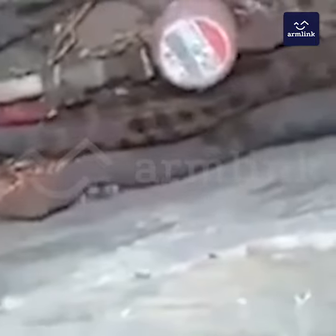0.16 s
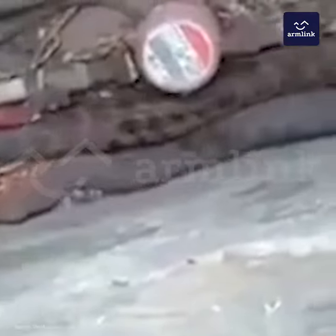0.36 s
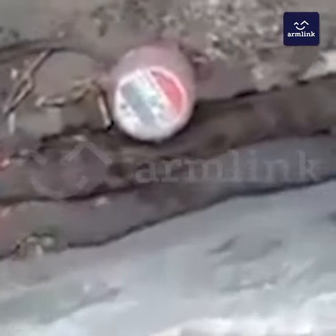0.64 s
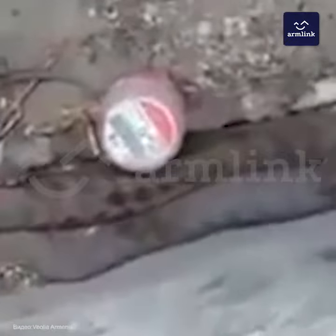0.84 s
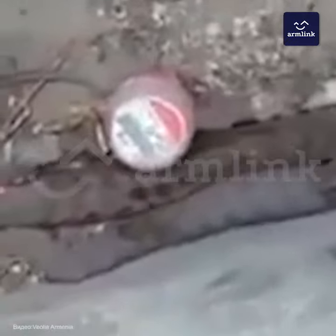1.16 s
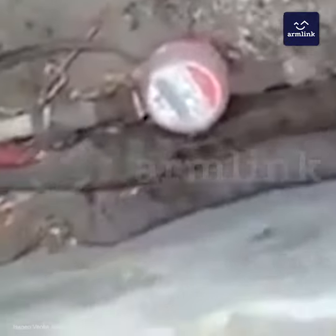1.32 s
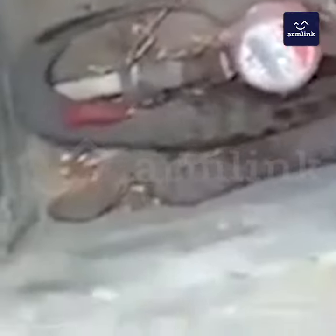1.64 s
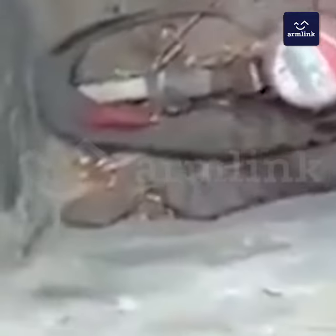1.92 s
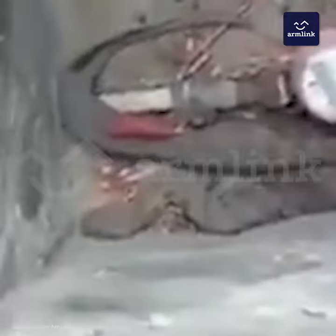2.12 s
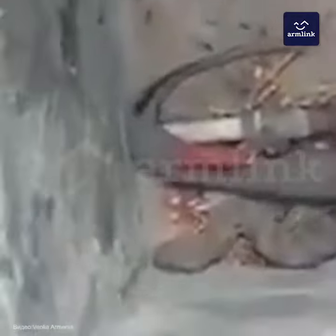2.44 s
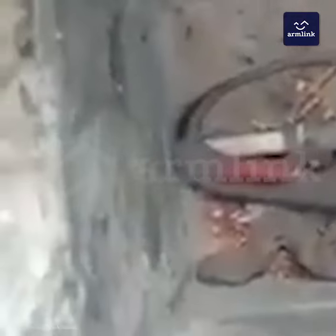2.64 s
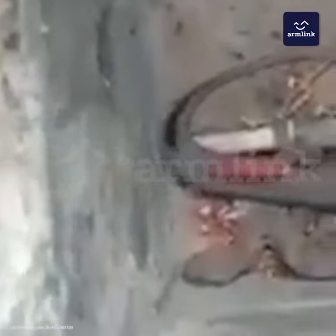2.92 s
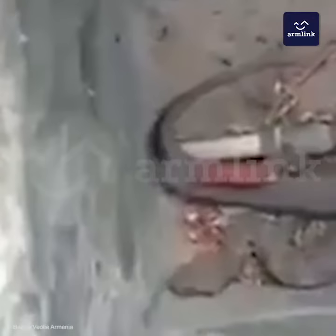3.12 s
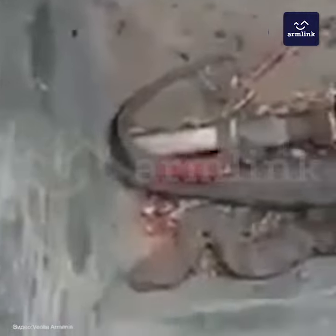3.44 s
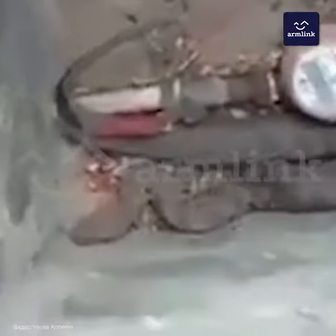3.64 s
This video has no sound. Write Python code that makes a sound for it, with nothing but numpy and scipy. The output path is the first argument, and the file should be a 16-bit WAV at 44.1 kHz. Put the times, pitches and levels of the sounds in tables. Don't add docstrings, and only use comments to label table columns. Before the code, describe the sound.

Continuous bright snake hiss close to a phone microphone, fading and turning throaty, over a soft draughty hum; a hollow knock early, a dull handling thump around one second, light taps later, watery close echoes off concrete.

```python
import sys
import numpy as np
from scipy import signal
from scipy.io import wavfile
from scipy.ndimage import uniform_filter1d

SR = 44100
rng = np.random.default_rng(int(sys.argv[2]) if len(sys.argv) > 2 else 0)


def file_out(sig):
    cols = np.atleast_2d(sig).T
    lim = np.clip(cols, -1, 1)
    pcm = np.round(lim * 32767).astype(np.int16)
    wavfile.write(sys.argv[1], SR, pcm)


def undo_db(level):
    steps = np.asarray(level, float) / 20
    return 10 ** steps


N = 166257
HOP, SIZE = 128, 1024
T = np.arange(N // HOP + 12) * HOP / SR
HZ = np.fft.rfftfreq(SIZE, 1 / SR)[:, None]
FULL_ABOVE_HZ = 1000


def curves(table):
    s, *cols = np.transpose(table)
    return [np.interp(T, s, c) for c in cols]


def evened(x, axis=None):
    return x / np.sqrt(np.mean(abs(x) ** 2, axis, keepdims=True) + 1e-20)


def colour(points):
    f, db = np.transpose(points)
    return undo_db(np.interp(np.log(HZ + 1), np.log(f + 1), db, right=-90))


def peak(hz, width):
    return 1 / (1 + (2 * (HZ - hz) / width) ** 2)


def low_cut(hz):
    return 1 / (1 + (hz / (HZ + 1)) ** 6)


def drift(rows, frames, bins=1):
    field = rng.standard_normal((len(T), rows)).T
    for _ in range(3):
        field = uniform_filter1d(field, frames, 1)
    return evened(uniform_filter1d(field, bins, 0))


def noise(gain):
    white = np.pad(rng.standard_normal(N), (0, 8 * HOP))
    z = signal.stft(white, nperseg=SIZE, noverlap=SIZE - HOP)[2]
    return signal.istft(z * gain[:, :z.shape[1]], nperseg=SIZE, noverlap=SIZE - HOP)[1][:N]


def add(mix, s, sound):
    part = mix[round(s * SR):][:len(sound)]
    part += sound[:len(part)]


def snake():
    # t/s, effort/dB, mouth resonance f/Hz, gape as upper resonance level/dB, rasp level/dB
    breath = [(.08, -42.5, 6180, -3, -11.5), (.8, -45.5, 5990, -2.5, -6), (.88, -41.5, 6180, -7.5, -5.5),
              (1.13, -42.5, 5770, -6, -7), (1.19, -48.5, 6040, -15, -4.5), (1.4, -59.5, 5850, -5.5, 5),
              (1.55, -50.5, 6410, -12.5, -4), (1.9, -51.5, 6530, -16.5, -4), (2.05, -57.5, 5870, -4.5, 7),
              (2.11, -53, 6360, -11.5, -7.5), (2.33, -54, 6540, -8, -1.5), (2.43, -61.5, 6250, 0.5, -1.5),
              (2.64, -59.5, 6000, -1.5, 1.5), (2.76, -55.5, 5580, -4.5, -1.5), (3.02, -58, 5860, -2.5, 2),
              (3.15, -54, 5800, -8, -3), (3.24, -58.5, 5900, -4, 1), (3.77, -59, 6380, -4.5, -3.5)]
    # f/Hz, level/dB
    rasp_spectrum = [(1500, -68), (2120, -3.5), (2400, -0.5), (3300, -1.5), (4200, -1), (5000, -4),
                     (6500, -48), (9000, -17.5)]
    effort_db, mouth_hz, gape_db, rasp_db = curves(breath)
    skirt = undo_db(-9) * peak(mouth_hz, width=3500)
    mouth = evened(peak(mouth_hz, width=900) + skirt, 0)
    upper = undo_db(gape_db) * evened(peak(8250, width=3630) ** 2)
    rasp = undo_db(rasp_db) * evened(colour(rasp_spectrum))
    flutter_db = 0.5 * drift(1, frames=9)
    return undo_db(effort_db + flutter_db) * np.sqrt(mouth ** 2 + upper ** 2 + rasp ** 2)


def echo_comb():
    echo_db, last_s, sway_m, sway_per_s = -3, .014, .004, 1.2
    delay = rng.uniform(.03, 1, (16, 1)) ** 1.5 * last_s
    phase = 2 * np.pi * rng.random((16, 6, 1))
    rate = sway_per_s * np.geomspace(.2, 2, 6)[:, None]
    sway = np.sin(2 * np.pi * rate * T[::4] + phase).sum(1)
    delay = delay + sway_m / 343 * sway
    echoes = sum(np.exp(-2j * np.pi * HZ * d) for d in delay) / 4
    gain = abs(1 + undo_db(echo_db) * echoes).repeat(4, 1)
    gain = uniform_filter1d(gain, 4, 1)[:, :len(T)]
    return gain / np.sqrt(uniform_filter1d(gain ** 2, 15, 0))


def walls():
    # start t/s, length t/s, from f/Hz, to f/Hz, width f/Hz
    broad_nulls = [(-.01, 0.14, 3680, 3620, 320), (0.0, 0.42, 5170, 5100, 110),
                   (0.07, 0.27, 1950, 2040, 170), (.28, .29, 1900, 1960, 120),
                   (0.13, 0.19, 3300, 3360, 110), (0.33, 0.27, 3420, 3400, 210),
                   (0.4, 0.23, 5000, 5000, 110), (.75, .06, 3500, 3530, 150), (0.85, 0.29, 3850, 3810, 75),
                   (1.13, 0.17, 3010, 2970, 150), (1.16, 0.14, 8970, 8970, 120),
                   (1.17, 0.21, 1950, 2100, 70), (1.23, 0.17, 1060, 1030, 85), (1.45, .16, 1090, 1230, 190),
                   (1.28, 0.17, 4520, 4490, 210), (1.85, 0.6, 3880, 3690, 140),
                   (1.92, 0.31, 4460, 4390, 110), (2.04, 0.27, 5010, 4990, 140),
                   (2.24, 0.25, 1750, 1740, 100), (2.28, 0.12, 4360, 4320, 200),
                   (2.25, 0.3, 4790, 4790, 100), (2.36, .09, 2980, 2970, 140),
                   (2.65, 0.27, 6700, 6390, 140), (2.89, 0.22, 4540, 4400, 130),
                   (3.13, .16, 4450, 4500, 190), (3.31, .15, 4510, 4470, 240),
                   (2.98, 0.35, 4020, 4020, 110), (3.29, 0.42, 6350, 6480, 90),
                   (3.42, 0.1, 3330, 3350, 200), (3.46, 0.15, 1070, 1060, 100)]
    # start t/s, length t/s, from f/Hz, to f/Hz
    thin_nulls = [(.1, .1, 3620, 3580), (.18, .17, 3930, 3880), (.18, .42, 4660, 4630),
                  (.55, .12, 1160, 1160), (.65, .15, 5060, 5130), (.62, .36, 2900, 3000),
                  (.96, .09, 6150, 6170), (1.03, .2, 4490, 4460), (1.05, .06, 1850, 1850),
                  (1.4, .15, 3150, 3120), (1.5, .27, 3440, 3380), (1.52, .19, 4500, 4600),
                  (1.64, .2, 4330, 4300), (1.72, .17, 1030, 1060), (1.99, .15, 1730, 1850),
                  (2, .1, 7720, 7820), (2.5, .33, 4110, 4060), (2.54, .12, 3620, 3450),
                  (2.7, .09, 3420, 3410), (2.95, .3, 2760, 2750), (3, .09, 1090, 1090),
                  (3.19, .1, 5580, 5530), (3.28, .16, 1150, 1150), (3.3, .45, 1010, 1010),
                  (3.4, .2, 4030, 4000), (3.5, .1, 3520, 3560), (3.68, .09, 2950, 3030),
                  (1.3, .3, 7200, 7250)]
    gain = echo_comb()
    nulls_db = np.zeros(gain.shape)
    for start, length, from_hz, to_hz, width_hz in [*broad_nulls, *[(*row, 65) for row in thin_nulls]]:
        along = (T - start) / length
        wander_hz = 12 * drift(1, frames=20)
        centre_hz = from_hz + (to_hz - from_hz) * along + wander_hz
        depth_db = -24 * (width_hz / 110) ** .4 + 5 * drift(1, frames=9)
        inside = np.clip(1 - (2 * along - 1) ** 6 * .5, 0, 1)
        now = inside > 0
        notch = np.exp(-(1.4 * (HZ - centre_hz[:, now]) / max(width_hz, 85)) ** 2)
        nulls_db[:, now] = np.minimum(nulls_db[:, now], (depth_db * inside)[:, now] * notch)
    patchy_db = 0.54 * drift(len(HZ), frames=24, bins=12)
    return gain * undo_db(nulls_db + patchy_db)


def streaks():
    field = drift(len(HZ), frames=30, bins=2)
    gaps = np.clip(-field - 1.3, 0, 1) / (1 + (HZ / 6000) ** 4)
    gaps = gaps * np.where(HZ > FULL_ABOVE_HZ, 1, .6)
    return evened(undo_db(1.9 * field - 26 * gaps))


def thumping():
    # t/s, peak level/dB, f/Hz
    thumps = [(0.05, -77, 88.5), (0.535, -73, 88), (0.633, -64, 81.5), (0.882, -75, 98),
              (1.128, -53.5, 96.6), (1.247, -64, 95), (1.636, -76, 93.5), (1.992, -71, 87),
              (2.426, -75, 99), (2.598, -71.5, 108), (2.668, -68, 92), (3.225, -64, 102)]
    rise_s, t60_s, gain_db = 0.0285, 0.15, 8
    out, t = np.zeros(N), np.arange(SR // 4) / SR
    rise = np.sin(np.pi / 2 * np.minimum(t / rise_s, 1)) ** 2
    for s, db, hz in thumps:
        fall = undo_db(db + gain_db - 60 * t / t60_s)
        add(out, max(s - rise_s / 2, 0), rise * fall * np.sin(2 * np.pi * hz * t))
    return out


def knocking():
    # t/s, peak level/dB
    knocks = [
        (0.378, -48),
        (0.736, -66),
        (0.876, -70),
        (0.969, -70),
        (2.014, -63),
        (3.248, -66),
    ]
    # f/Hz, level/dB, decay t60/s
    knock_modes = [(102, -10, 0.14), (341, 0, 0.049), (660, 5.5, 0.025), (917, -6, 0.025)]
    rise_s, gain_db = 0.0016, 5.5
    out, t = np.zeros(N), np.arange(SR // 4) / SR
    ring = sum(undo_db(db - 60 * t / t60) * np.sin(2 * np.pi * hz * t) for hz, db, t60 in knock_modes)
    for s, db in knocks:
        add(out, s - rise_s, undo_db(db + gain_db) * np.minimum(t / rise_s, 1) * ring)
    return out


def pit():
    # t/s, hum level/dB, rustle level/dB, lower pipes level/dB
    draught = [(0, -54.5, -0.5, 1.5), (.1, -54, -2, -13), (.6, -58, 0.5, -17), (.74, -62.5, 0.5, -13),
               (.9, -54.5, -3.5, -2), (1.12, -54.5, -5, -1), (1.16, -67, -6, 6.5), (1.3, -68, -6.5, 2.5),
               (1.6, -63.5, -6, 1.5), (1.72, -61, 0, 1), (1.9, -60, 0, 3), (2.4, -57, -4, -8.5),
               (2.66, -60, -5, -2), (2.8, -60, -3.5, 4), (3.13, -65, 1.5, 4.5), (3.19, -71, 1.5, -2.5),
               (3.62, -69.5, 1, 1.5), (3.72, -67.5, -0.5, 6.5)]
    # f/Hz, width f/Hz, level/dB
    pipe_modes = [(357, 53, -15), (644.4, 90, 4), (767, 510, -9), (905.3, 119, 2)]
    # f/Hz, level/dB
    rumble_spectrum = [(15, -29.5), (25, -0.5), (96, -2.5), (119, 2), (156, -40.5), (188, -15.5),
                       (346, -4.5), (430, -19.5), (520, -5.5), (680, -10), (1140, -120)]
    hum_db, rustle_db, low_db = curves(draught)
    pipes = 0
    for hz, width, db in pipe_modes:
        puffs_db = db + low_db * (hz < 700) + 2.2 * drift(1, frames=10)
        pipes = pipes + undo_db(puffs_db) * peak(hz, width) ** 2
    pipes = evened(pipes) * low_cut(270)
    rustle = undo_db(rustle_db) * evened(peak(1524, width=2500) ** 2 * low_cut(570))
    gusts_db = 3.5 * drift(len(HZ), frames=16, bins=5)
    rumble = undo_db(-76.5 + gusts_db) * evened(colour(rumble_spectrum))
    return np.sqrt(undo_db(2 * hum_db) * (pipes ** 2 + rustle ** 2) + rumble ** 2)


def port():
    hz, width_hz = 6900, 130
    above = (HZ > hz + width_hz) * np.exp(-abs(HZ - hz) / 1600)
    return undo_db(3 * peak(hz, width_hz) + 1 * above)


def hollowed(z):
    power = uniform_filter1d(uniform_filter1d(abs(z) ** 2, 14, 1), 2, 0)
    near_db = 10 * np.log10(abs(power) + 1e-20)
    excess_db = near_db - uniform_filter1d(near_db, 17, 0)
    excess_db = excess_db * np.where(HZ > FULL_ABOVE_HZ, 1, .4)
    sink_db = np.clip(2.5 * (excess_db + 5.5), -28, 0)
    return z * undo_db(sink_db + .25 * excess_db)


def top_band(t):
    # start t/s, end t/s, level/dB
    top_spells = [(0.096, 0.414, 1), (0.483, 0.684, 2), (0.835, 0.91, 5), (0.972, 1.31, -8),
                  (1.562, 1.747, -5), (1.965, 2.05, -5), (2.207, 2.56, -2.5), (2.682, 2.717, -8),
                  (2.762, 2.786, -2), (3.214, 3.25, -7), (3.63, 3.78, -5)]
    shut_db = -47
    top_db = shut_db + sum((db - shut_db) * ((t > a) & (t < b)) for a, b, db in top_spells)
    top_db = top_db + 6 * drift(1, frames=6)[0, :len(t)]
    edge_hz = 9360 + 50 * drift(1, frames=8)[:, :len(t)]
    return np.where(HZ > edge_hz, undo_db(top_db), 1) * (HZ < 10200)


def splits():
    # t/s, low f/Hz, high f/Hz, level/dB
    side_bursts = [
        (0.397, 7700, 8940, -54),
        (2.558, 5640, 8150, -60),
        (2.909, 6900, 8300, -67),
    ]
    out, count = np.zeros(N), round(.046 * SR)
    for s, low_hz, high_hz, db in side_bursts:
        sos = signal.butter(8, [low_hz, high_hz], "band", fs=SR, output="sos")
        band = signal.sosfilt(sos, rng.standard_normal(count))
        add(out, s, undo_db(db) * evened(band) * np.hanning(count) ** .5)
    return out


def quiet_floor(mono):
    quiet = uniform_filter1d(mono ** 2, SR // 4) < undo_db(2 * -44.8)
    patchy_db = 4.5 * drift(len(HZ), frames=14, bins=7)
    return undo_db(-87) * quiet * noise(evened(undo_db(patchy_db)))


def scene():
    comb = walls() * streaks()
    hum_share = np.clip(HZ / 1200, .3, 1)
    air = noise(np.hypot(snake() * comb, pit() * comb ** hum_share))
    mono = air + thumping() + knocking()
    return np.array([mono, mono])


def roll_off(x):
    return signal.sosfilt(signal.butter(12, 12000, fs=SR, output="sos"), x)


def record(dry):
    mic = signal.lfilter(*signal.butter(2, 67, "high", fs=SR), dry[0])
    _, t, z = signal.stft(mic, SR, nperseg=SIZE, noverlap=SIZE - HOP)
    z = hollowed(z * port()) * top_band(t)
    mono = signal.istft(z, SR, nperseg=SIZE, noverlap=SIZE - HOP)[1][:N]
    mono = mono + quiet_floor(mono)
    side = splits()
    return roll_off(np.array([mono + side, mono - side]))


dry = scene()
out = record(dry)
file_out(out)
```